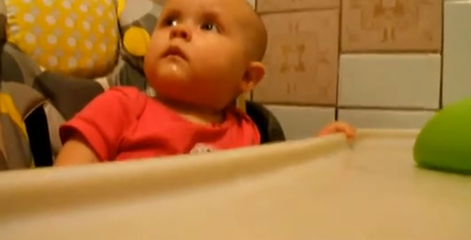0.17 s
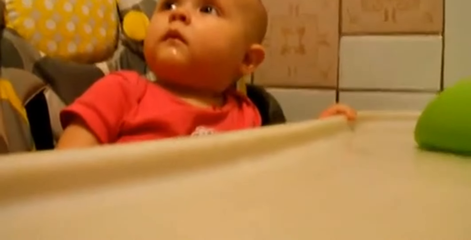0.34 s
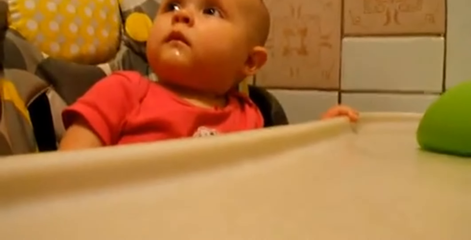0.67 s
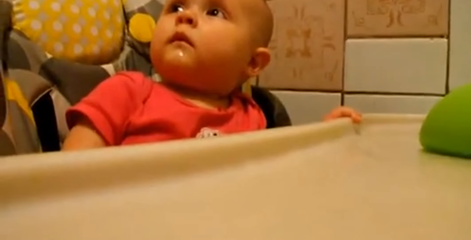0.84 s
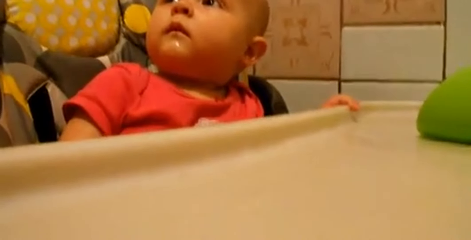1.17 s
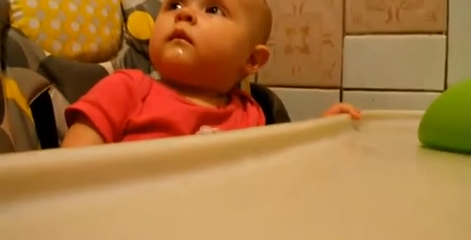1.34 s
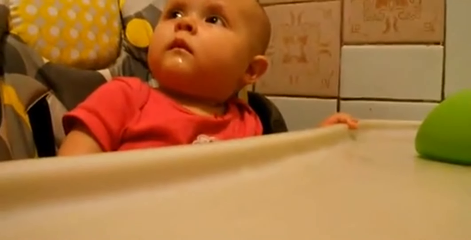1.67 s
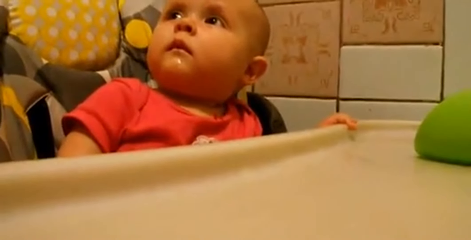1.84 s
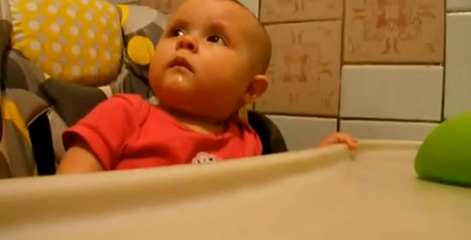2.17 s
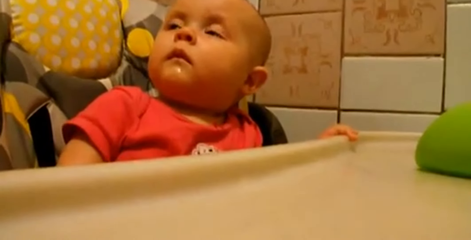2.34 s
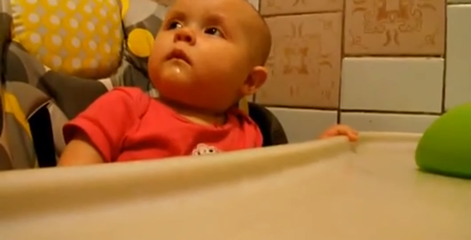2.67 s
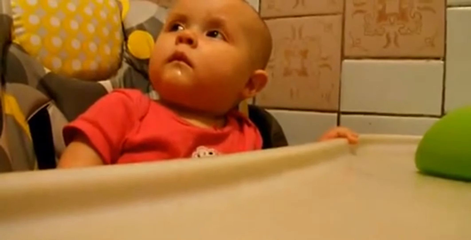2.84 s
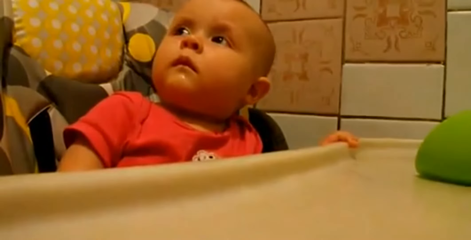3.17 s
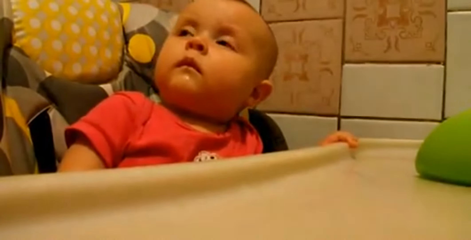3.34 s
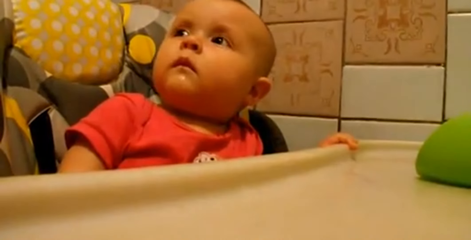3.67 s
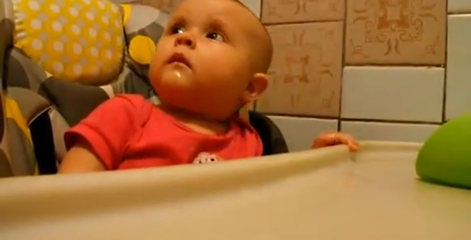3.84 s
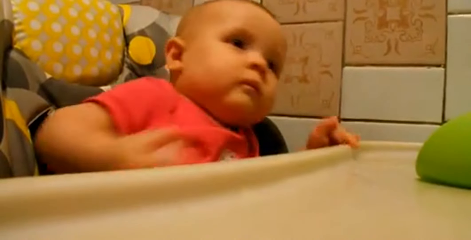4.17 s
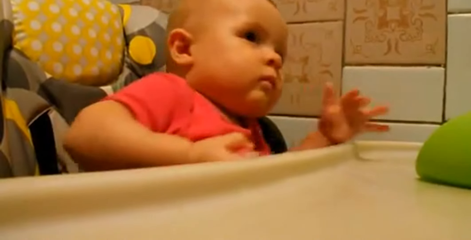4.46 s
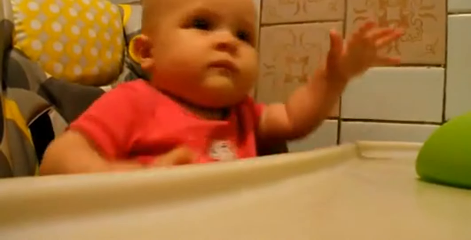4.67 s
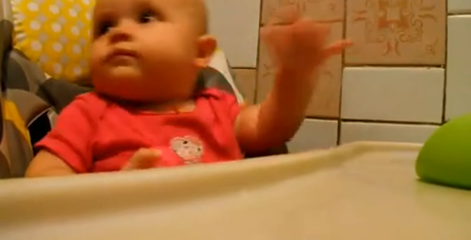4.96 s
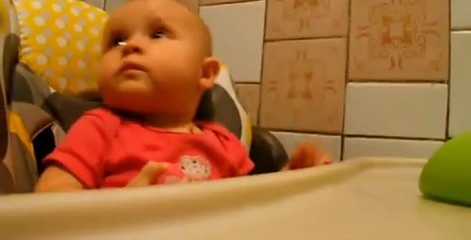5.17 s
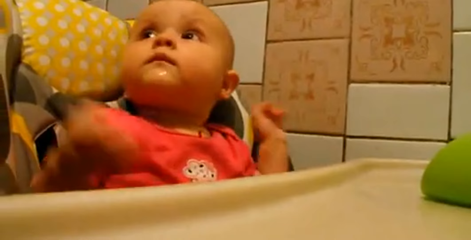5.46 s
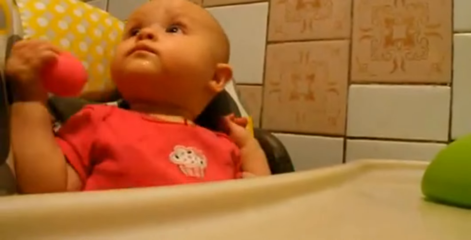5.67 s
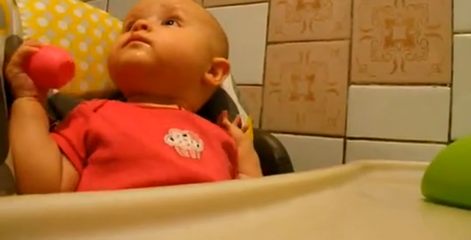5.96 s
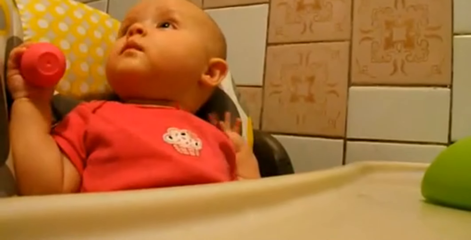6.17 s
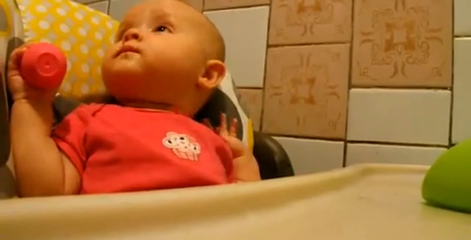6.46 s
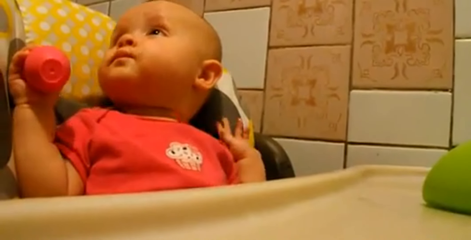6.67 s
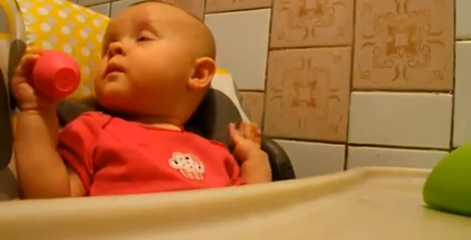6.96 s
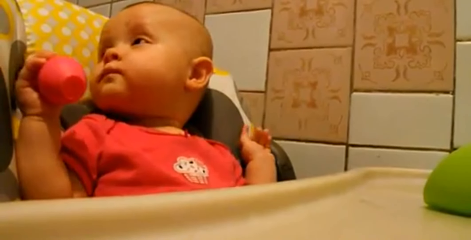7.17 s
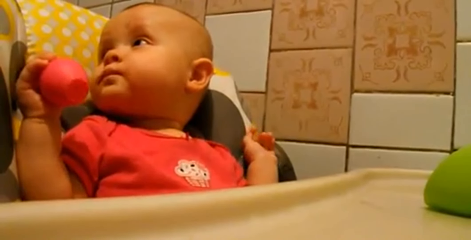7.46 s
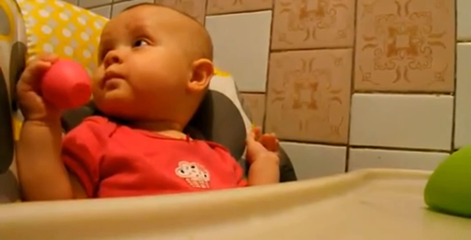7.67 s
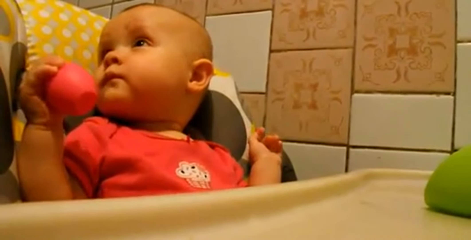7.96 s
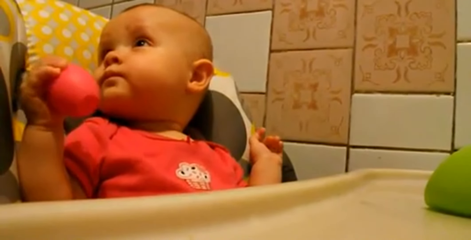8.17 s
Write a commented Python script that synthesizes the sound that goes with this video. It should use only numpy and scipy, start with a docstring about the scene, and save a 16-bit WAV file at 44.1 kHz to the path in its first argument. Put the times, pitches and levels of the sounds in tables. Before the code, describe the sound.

In a quiet tiled kitchen, a few plastic clicks and scuffs, then a vacuum cleaner snaps on, whines quickly upward and roars steadily.

```python
"""A vacuum cleaner motor spins up in a small tiled kitchen, after clicks and scuffs in the quiet room.
Its whine is sines on multiples of one shaft angle; short extra tones and a grating colour the run-up.
Shaped noise makes the rush of air and soft thuds; ringing modes make clicks, grainy noise makes scuffs.
The tiles echo the whine and the handling, near walls and floor echo the air, over room noise and faint hum."""
import sys
import numpy as np
from scipy import signal
from scipy.io import wavfile
from scipy.ndimage import uniform_filter1d

SR = 44100
rng = np.random.default_rng(int(sys.argv[2]) if len(sys.argv) > 2 else 0)


def bounce(signal):
    """Save signal as a 16-bit WAV file at the path given by the first command-line argument."""
    frames = np.transpose(np.atleast_2d(signal))
    limited = np.clip(frames, -1, 1)
    pcm = np.round(limited * 32767).astype(np.int16)
    wavfile.write(sys.argv[1], SR, pcm)


N = 366030
T = np.arange(N) / SR
ON_S = 2.7588  # the motor starts


def amp(db):
    """Decibels to amplitude."""
    return 10 ** (np.asarray(db) / 20)


def evened(x):
    """The signal scaled to rms 1."""
    return x / np.sqrt(np.mean(x ** 2) + 1e-20)


def follow(rows, before):
    """Columns of a time table at every sample, with a fixed value ahead of the first row."""
    s, *columns = np.transpose(rows)
    return [np.interp(T, s, c, left=before) for c in columns]


def wander(hz):
    """Slow random curve of rms 1, with changes up to hz."""
    return evened(signal.resample(rng.standard_normal(round(2 * hz * N / SR)), N))


def noise(points, patchy_db):
    """Noise of a given spectrum with faint patches in time and pitch."""
    hz = np.fft.rfftfreq(1024, 1 / SR)
    f, db = np.transpose(points)
    real, imaginary, patches = rng.standard_normal((N // 256 + 5, 513, 3)).T
    patches = uniform_filter1d(patches, size=10, axis=0)
    patches = evened(uniform_filter1d(patches, size=12, axis=1))
    shape_db = np.interp(np.log(hz + 1), np.log(f), db, left=-70, right=-70)
    spectra = (real + 1j * imaginary) * amp(shape_db[:, None] + patchy_db * patches)
    return evened(signal.istft(spectra, nperseg=1024, noverlap=768)[1][:N])


def ring(x, hz, width_hz):
    """A two-pole resonance."""
    return signal.lfilter(*signal.iirpeak(hz, hz / width_hz, SR), x)


def shaft():
    """Shaft speed in Hz: two exponential approaches to full speed, a slow creep upward, small strays."""
    full_hz, creep_hz_per_s = 566.84, .319
    quick_share, quick_s, slow_s = .4264, .1569, .3672
    # the speed strays a little from that law: t/s, offset/Hz
    stray = [(2.95, 0), (3.03, 7), (3.12, 3), (3.27, -7), (3.35, -1.5), (3.6, 0), (5.5, -1.1), (6.7, .3),
             (8.3, -.3)]
    since = np.maximum(T - ON_S, 0)
    quick_lag = quick_share * np.exp(-since / quick_s)
    slow_lag = (1 - quick_share) * np.exp(-since / slow_s)
    lag = quick_lag + slow_lag  # 1 at rest, 0 at full speed
    turns = full_hz * (1 - lag) + creep_hz_per_s * since + follow(stray, 0)[0]
    return turns, lag


def shaft_tones(turns, lag, angle):
    """Sines locked to the shaft, coloured by resonances; random phase slip and level waver blur them."""
    # unbalance 1-4, two bearing tones, nine fan blades and their octave: multiple of the shaft
    multiples = (1, 2, 3, 3.6, 4, 4.4, 9, 18)
    # slow drift at full speed: t/s, then level/dB of each tone in that order
    drift = [(4.7, -38, -40.5, -34.5, -46, -46.5, -47, -33.5, -50),
             (5.1, -37, -56, -34.5, -45, -48, -54, -37.5, -60),
             (5.7, -37.5, -54, -34.5, -47, -44, -52, -33, -54),
             (6.2, -34.5, -44, -32.5, -51, -50, -40, -35.5, -58),
             (6.8, -35, -42, -31, -50, -51, -42, -40.5, -56),
             (7.1, -35.5, -39.5, -33.5, -50, -55, -40, -36, -53),
             (7.45, -35.5, -46, -36.5, -47, -59, -57, -35, -50),
             (7.9, -33, -40, -37, -55, -60, -57, -42, -44.5),
             (8.29, -32.5, -42, -33.5, -56, -51, -60, -46, -45)]
    # quick unsteadiness of each tone at full speed: waver/dB
    wavers = (1.22, 3.0, 1.04, 3.2, 3.8, 2.2, 2.0, 1.8)
    # how much weaker each tone is at half speed: drop/dB
    sinks = (14, 28, 23, 30, 30, 18, 5.4, 20)
    # resonances of housing and room passed in the run-up, one list per tone; the big swell on the blades'
    # octave is a brief squeal: f/Hz, width/Hz, gain/dB
    resonances = [
        [(150, 90, -25), (405, 14, 7.5), (442, 17, 7.5), (482, 6, 9), (513.8, 19, 13.5), (542.6, 3.8, 10),
         (560.53, 5.35, 13)],
        [(775, 70, -12), (1036, 28, -15.5), (1070, 8, 8), (1120, 8, 5)],
        [(830, 50, 14), (1210, 74, -18), (1450, 48, -11), (1562, 13, -22), (1652, 13, -11.5), (1674, 5.6, -15)],
        [(1520, 70, -14), (1676, 70, 10), (1916, 100, -13)],
        [(2000, 190, -16)],
        [(1800, 150, 10), (2290, 50, -10), (2403, 18, 5)],
        [(1400, 1200, -42), (3280, 130, 5), (3614, 100, 12.5), (3990, 300, 6), (4470, 120, -7), (4830, 130, 4)],
        [(4680, 500, 52), (6700, 400, 20), (8440, 1340, -15), (9480, 65, 10), (9780, 140, 9)],
    ]
    slip_slow, slip_quick, slip_run_up = .024, .014, .062  # radians per multiple of the shaft
    unsettled = 1 + .9 * lag  # the flow is ragged until the fan reaches speed
    halvings = -np.log2(1 - lag + 1e-6)
    s, *steady = np.transpose(drift)
    out = np.zeros(N)
    for k, levels, sink_db, swells, waver_db in zip(multiples, steady, sinks, resonances, wavers):
        swell_db = sum(d * np.exp(-((k * turns - hz) / w) ** 2) for hz, w, d in swells)
        db = np.interp(T, s, levels) - sink_db * halvings + swell_db
        slow = slip_slow * unsettled ** 2 * wander(20)
        quick = (slip_quick + slip_run_up * np.tanh(8 * lag)) * wander(150)
        waver = waver_db * np.sqrt(unsettled) * wander(30)
        out += amp(db + waver) * np.sin(k * angle + k * (slow + quick))
    return out * (T > ON_S)


def bearing(angle):
    """A lower bearing tone, a wavering sine locked to the shaft, sounds only during the run-up."""
    # t/s, level/dB
    swell = [(3.2, -62), (3.34, -44), (3.46, -37.5), (3.6, -44), (4.05, -65)]
    level = amp(follow(swell, -120)[0] + 3.0 * wander(15))
    return level * np.sin(3.4 * angle + .3 * wander(30)) * (T < swell[-1][0])


def whistle(angle):
    """A brief high whistle: a sine at 27 times the shaft speed, roughened by quick phase wander."""
    # t/s, level/dB
    flares = [(2.83, -55), (2.865, -36), (2.9, -56), (2.97, -68), (3.01, -43.5), (3.1, -53), (3.2, -65)]
    tone = np.sin(27 * angle + 0.98 * wander(400))
    return amp(follow(flares, -120)[0]) * tone * (T < flares[-1][0])


def squeal(angle):
    """A rough squeal as the rotor breaks loose: a shaft-locked sine with strong phase wander."""
    # t/s, level/dB
    burst = [(2.83, -50), (2.85, -36), (2.885, -33), (2.9, -55)]
    tone = np.sin(12.4 * angle + 1.2 * wander(300))
    return amp(follow(burst, -120)[0]) * tone * (T < burst[-1][0])


def drone():
    """A low drone of fixed pitch comes and goes, its level and phase wandering."""
    # t/s, level/dB
    coming_and_going = [(4.8, -74), (5.1, -64), (6.3, -70), (6.8, -78), (7.6, -76), (7.8, -66)]
    level = amp(follow(coming_and_going, -120)[0] + 1.5 * wander(8))
    return level * np.sin(2 * np.pi * 210 * T + .4 * wander(6))


def motor():
    """All tones of the motor, most of them riding on one shaft angle."""
    turns, lag = shaft()
    angle = 2 * np.pi * np.cumsum(turns) / SR
    tones = shaft_tones(turns, lag, angle) + bearing(angle) + whistle(angle) + squeal(angle) + drone()
    return np.sqrt(2) * tones  # table levels are rms


def grate():
    """The brushes grate as the rotor breaks loose: uneven scraping noise rings the motor frame."""
    # t/s, level/dB
    burst = [(2.815, -55), (2.84, -38), (2.865, -28), (2.89, -26), (2.905, -37), (2.935, -35), (3.04, -44)]
    # what rings with it: f/Hz, width/Hz, level/dB
    frame = [(2870, 250, 0), (4150, 250, 3.5), (4900, 300, 0), (5600, 700, 0), (8000, 2000, -7.5)]
    scrape = rng.standard_normal(N) * amp(3.6 * wander(140))
    rung = sum(amp(db) * evened(ring(ring(scrape, hz, w), hz, w)) for hz, w, db in frame)
    return amp(follow(burst, -120)[0]) * evened(rung) * (T < burst[-1][0])


def low_rumble():
    """Soft low rumble: dull noise whose level heaves at random."""
    # f/Hz, relative level/dB per Hz
    low = noise([(20, -9), (85, -1), (122, 5), (170, -3), (310, -8)], patchy_db=1.0)
    heave = amp(10 * np.clip(wander(9), -1.4, 1.1))
    return amp(-79) * low * heave * (T > ON_S)


def air():
    """Hiss at the exhaust and a lower roar with hollows of the housing singing in it."""
    # air flow: t/s, hiss level/dB, roar level/dB
    flow = [(2.78, -55, -46), (2.815, -49, -42), (2.855, -28.5, -45.5), (2.9, -29.5, -44),
            (2.95, -34, -42.5), (3.15, -31.5, -40.5), (3.8, -28, -36), (8.3, -27, -35)]
    # exhaust turbulence: f/Hz, relative level/dB per Hz
    hiss_shape = [(1060, -20), (1800, -9.5), (2150, -10.5), (2440, -5), (2730, -7), (3310, -1.5),
                  (4930, -1.5), (5300, -4.5), (5650, -9.5), (7720, -21), (9960, -24.5), (12600, -36)]
    # lower rush: f/Hz, relative level/dB per Hz
    roar_shape = [(110, -44), (240, -24), (330, -15), (430, -3), (700, 1), (1000, -2.5), (1400, 3),
                  (1900, -8), (2600, -8.5)]
    # hollows of the housing, and two further narrow bands near 2 kHz: f/Hz, width/Hz, level over the roar/dB
    housing = [(1114, 60, -5), (298, 16, -24), (411.5, 17, -21), (1346, 24, -12.5), (2024, 45, -19),
               (2254, 48, -12.5), (4760, 90, -3.5)]
    hiss_db, roar_db = follow(flow, -120)
    hiss = amp(hiss_db + .5 * wander(12)) * noise(hiss_shape, patchy_db=1.0)
    white = rng.standard_normal(N)
    hollows = sum(amp(db) * evened(ring(white, hz, w)) for hz, w, db in housing)
    roar = amp(roar_db) * (noise(roar_shape, patchy_db=1.18) + hollows)
    return hiss + roar


def thuds():
    """Pushing the machine about sends soft low puffs through the floor: a boom under wide dull noise."""
    # t/s, level at the swell's top/dB
    pushes = [(2.78, -58), (2.89, -58), (3.08, -59), (3.67, -56), (3.99, -54), (4.209, -57), (4.348, -57),
              (4.484, -56), (5.5, -58), (6.023, -56), (6.961, -54), (7.124, -55), (7.51, -55), (7.622, -57),
              (7.924, -57)]
    boom_hz, rise_s = 118, .02
    out = np.zeros(N)
    u = T[:6000] / rise_s
    swell = u ** 2 * np.exp(2 - 2 * u)  # tops out at 1 after the rise time
    for (s, db), white in zip(pushes, rng.standard_normal((len(pushes), 6000))):
        boom = evened(ring(ring(white, boom_hz, 45.), boom_hz, 200.))
        wide = evened(ring(ring(white, 70., 280.), 70., 280.))
        out[round(s * SR):][:6000] += amp(db) * swell * evened(boom + .5 * wide)
    return out


def clicks():
    """Each hard click rings the same plastic modes, brighter or duller; high modes die first."""
    # t/s, peak level/dB, brightness of the upper modes/dB
    hits = [(.223, -38.5, 6), (.848, -31, 2), (1.391, -41, 8), (1.421, -39, 14), (1.433, -26.5, 14),
            (1.439, -36, 12), (1.444, -37, 10), (1.476, -31.5, -3), (1.489, -36, -4), (1.52, -33, -10),
            (1.525, -40, 2), (1.879, -33, 5), (1.993, -36, -3), (2.328, -34, 3), (2.775, -29, 0)]
    # plastic modes, before random detuning: f/Hz, level/dB, share of the brightness
    modes = [(740, -11.5, 0.11), (1170, 4, 0.048), (1800, -5, 0.81), (2280, 3, 1), (2640, 1, 0.96),
             (3170, 3, 0.44), (3970, 2, 0.6), (4660, 2, 0.88)]
    t60_s = 0.024  # for a mode listed at 1200 Hz
    out, t = np.zeros(N), T[:3000]
    onset = 1 - np.exp(-(t / 0.00057) ** 2)
    draws = rng.random((len(hits), 2, len(modes)))
    for (s, db, bright_db), (detune, phase) in zip(hits, draws):
        tone = np.zeros(len(t))
        for (hz, mode_db, share), u, p in zip(modes, detune, phase):
            decay_db = 60 * t / t60_s * (hz / 1200) ** 0.5
            sine = np.sin(2 * np.pi * (hz * (0.947 + 0.13 * u) * t + p))
            tone += amp(mode_db + share * bright_db - decay_db) * sine
        tone *= onset
        out[round(s * SR):][:len(t)] += amp(db) * tone / abs(tone).max()
    return out


def scuffs():
    """Things dragged or shifted: grainy friction noise in one broad resonance, quick rise, slower fall."""
    # t/s, length/s, level/dB, centre f/Hz, width/Hz
    drags = [(0.184, 0.05, -56, 1130, 300), (0.797, .035, -52.5, 1250, 600), (1.368, .09, -57, 2400, 2500),
             (1.412, 0.05, -54, 1200, 300), (1.38, .035, -55, 4800, 500), (1.989, 0.085, -48.5, 895, 1200),
             (2.076, 0.065, -50, 780, 500), (2.19, .04, -56, 900, 900), (2.292, 0.027, -52, 1200, 700),
             (2.328, 0.11, -45.5, 1370, 1300), (2.322, 0.18, -57, 3900, 2000),
             (2.335, 0.14, -51.5, 2300, 160), (1.994, .05, -53, 3300, 1500), (2.355, 0.07, -53, 523, 200),
             (2.774, 0.084, -35.5, 1430, 2100)]
    out = np.zeros(N)
    for s, length, db, hz, width_hz in drags:
        graininess = amp(3.0 * rng.standard_normal(400).repeat(20))
        grains = rng.standard_normal(8000) * graininess
        body = evened(ring(ring(grains, hz, width_hz), hz, 2 * width_hz))
        shape = np.sin(np.pi * np.clip(T[:8000] / length, 0, 1) ** 0.51)
        out[round(s * SR):][:8000] += amp(db) * body * shape
    return out


def room(x, t60):
    """Echo from sparse taps of random sign that die away by 60 dB in t60 seconds."""
    taps = np.zeros(SR // 2)
    at = np.arange(200, SR // 2 - 20, 20)
    taps[at + rng.integers(0, 20, len(at))] = rng.choice([-1., 1.], len(at))
    taps *= amp(-60 * T[:SR // 2] / t60)
    return signal.oaconvolve(x, taps / np.linalg.norm(taps))[:N]


def background():
    """Steady shaped noise of the quiet room with a faint hum, a sine of wandering phase."""
    # f/Hz, relative level/dB per Hz
    quiet_shape = [(30, -45), (75, -30), (97, -10), (130, -16.5), (220, -20), (300, -6), (380, -8),
                   (600, -5.5), (1150, -6.5), (2260, -8.5), (5000, -9), (6500, -11.5), (12600, -15)]
    quiet = amp(-55) * noise(quiet_shape, patchy_db=1.2)
    hum = amp(-69) * np.sin(2 * np.pi * 322.5 * T + .9 * wander(6))
    return quiet + hum


def scene():
    """The machine and the handling, their echoes, the thuds and the background."""
    tones, handling = motor(), clicks() + scuffs()
    rush = air() + low_rumble() + grate()
    # hard tiles throw the high whine back best, smearing its glide
    tiled_whine = amp(-4) * ring(tones, 3800, 950)
    tile_echo = room(amp(-9.5) * handling + tiled_whine, t60=0.32)
    near_echo = amp(-10.5) * room(rush, t60=0.1)  # walls and floor close to the machine
    return (tones + rush + handling + tile_echo + near_echo + thuds() + background())[None]


def record(dry):
    """A steep low-pass: nothing sounds above about 12 kHz."""
    lowpass = signal.firwin(511, 12150, window=("kaiser", 9), fs=SR)  # edge in Hz
    return signal.oaconvolve(dry, lowpass[None], "same")


dry = scene()
out = record(dry)
bounce(out)
```